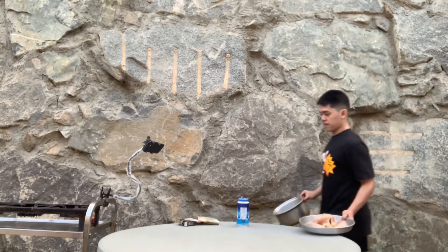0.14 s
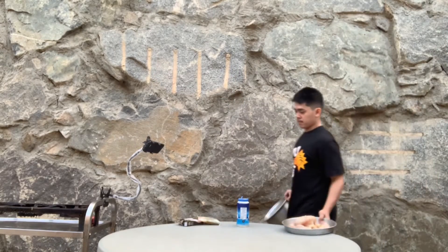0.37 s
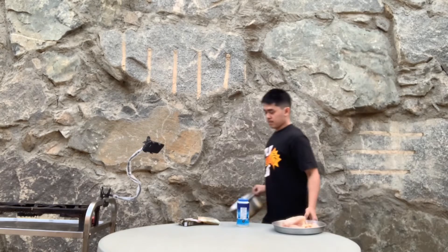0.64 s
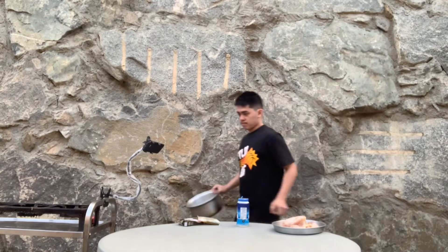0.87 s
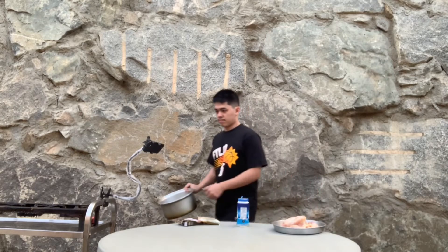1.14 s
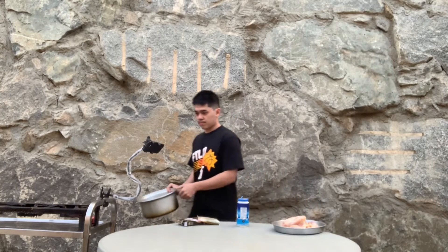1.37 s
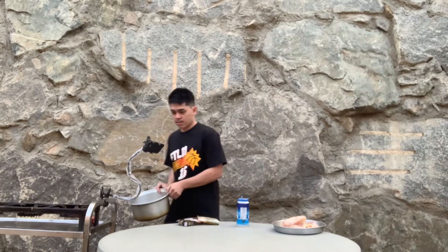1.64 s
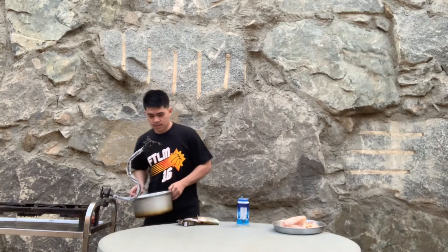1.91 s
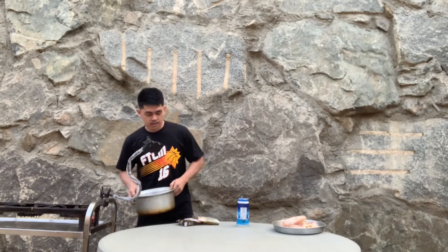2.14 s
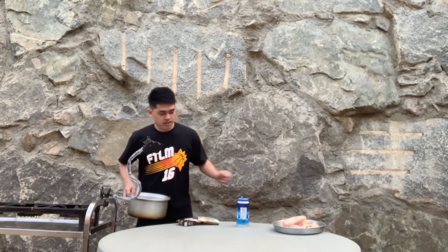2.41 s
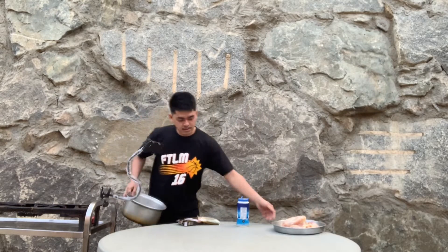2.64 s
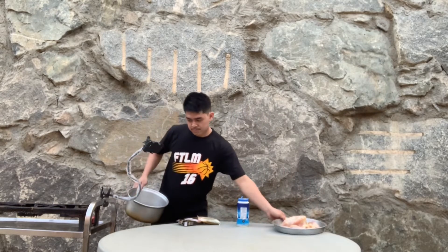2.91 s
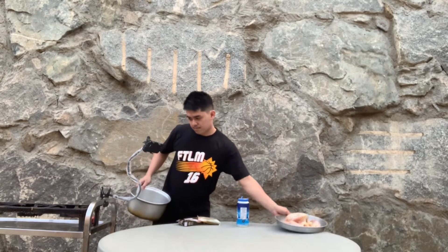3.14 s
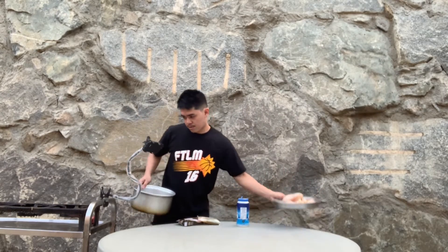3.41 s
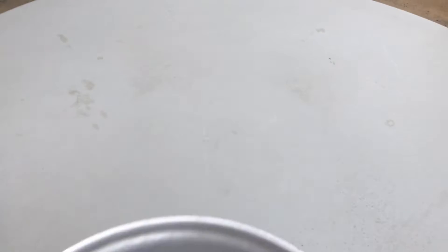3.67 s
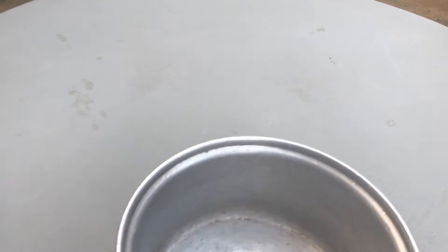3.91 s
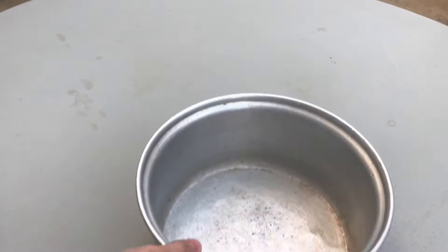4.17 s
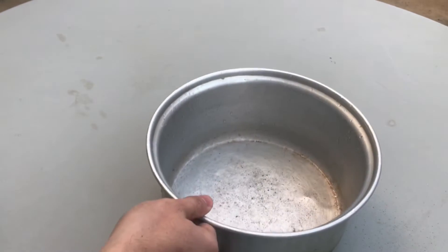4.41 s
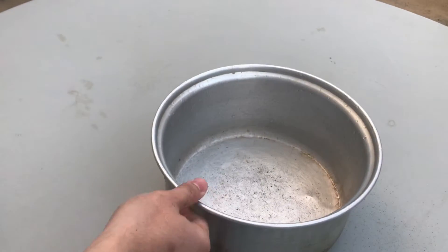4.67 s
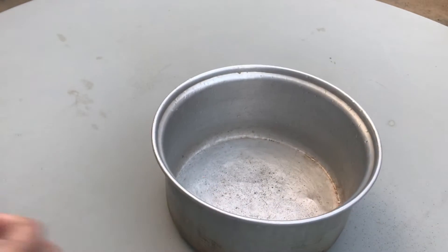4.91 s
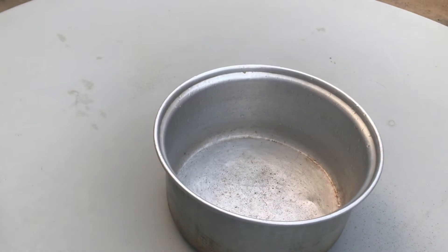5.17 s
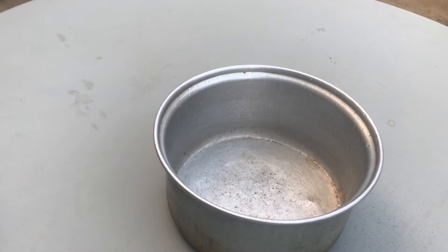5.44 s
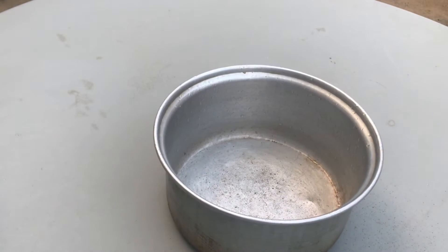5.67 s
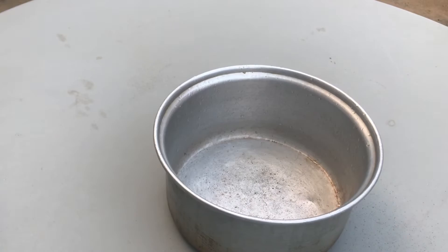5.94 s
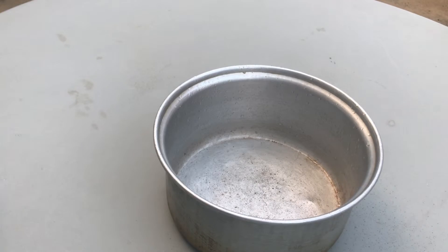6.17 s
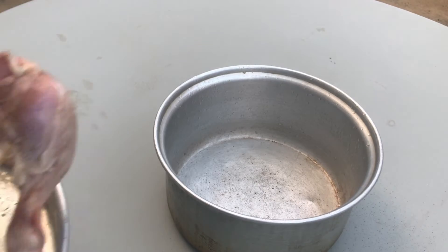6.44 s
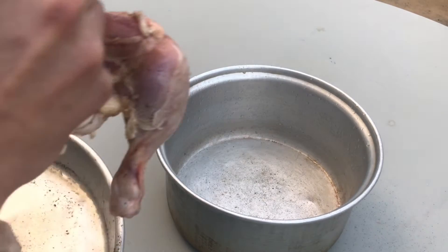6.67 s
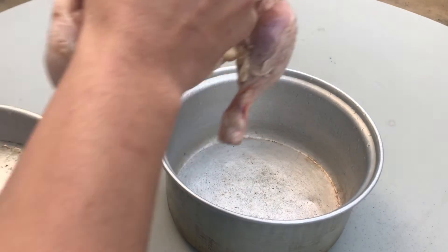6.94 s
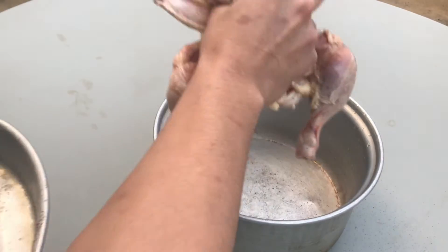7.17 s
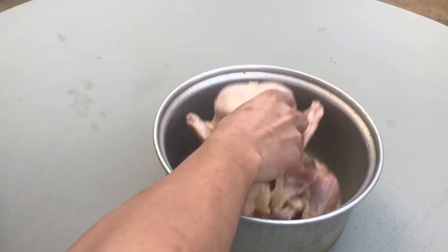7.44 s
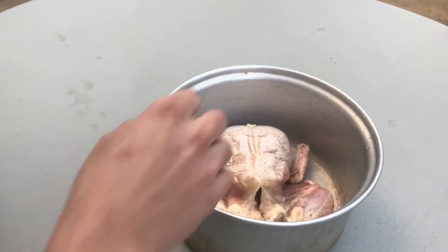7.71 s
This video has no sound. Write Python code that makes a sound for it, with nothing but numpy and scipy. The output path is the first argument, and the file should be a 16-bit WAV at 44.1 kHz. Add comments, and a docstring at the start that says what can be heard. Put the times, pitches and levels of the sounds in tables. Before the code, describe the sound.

Distant tray knocks and shuffling shoes, a tiny gap, then a close aluminium pot clank and scrape, faint ticks, and a wet, ringing thud.

```python
"""Outdoor cooking table before a stone wall, heard wide in stereo, then after a short gap close up in mono.
Wide: a tray is set down (blows ring its modes), shoes scuff on gritty paving (filtered friction noise and snaps).
Close: an aluminium pot lands on the plastic table (struck modes) and is slid along it (modes driven by stick-slip),
fingers and wet skin tick (noise bursts), then a raw chicken slaps into the pot (bursts, squelch and a ringing rim).
Far traffic and air (coloured noise) lie under both, with low throbs (wavering sines)."""
import sys
import numpy as np
from scipy import signal
from scipy.fft import rfft, irfft, next_fast_len
from scipy.io import wavfile
from scipy.ndimage import uniform_filter1d

SR = 44100
rng = np.random.default_rng(int(sys.argv[2]) if len(sys.argv) > 2 else 0)


def how_loud(loudness_db):
    """Turn decibels into a plain amplitude multiplier (0 dB gives 1, 20 dB gives 10)."""
    steps = np.asarray(loudness_db, float) / 20
    return 10 ** steps


def bounce(signal):
    """Save signal as a 16-bit WAV file at the path given by the first command-line argument."""
    frames = np.transpose(np.atleast_2d(signal))
    limited = np.clip(frames, -1, 1)
    pcm = np.round(limited * 32767).astype(np.int16)
    wavfile.write(sys.argv[1], SR, pcm)


N = 344862
T = np.arange(N) / SR  # time axis, s
CUT_S = 3.6365  # the wide view ends


def unit(x):
    """Scale to rms 1."""
    return x / np.sqrt(np.mean(x ** 2))


def colour(x, points):
    """Filter by (Hz, dB) points joined on a log frequency axis."""
    hz, db = np.transpose(points)
    size = next_fast_len(len(x))
    f = np.maximum(np.fft.rfftfreq(size, 1 / SR), 1)
    gain = how_loud(np.interp(np.log(f), np.log(hz), db))
    return irfft(rfft(x, size) * gain, size)[:len(x)]


def grains(spread_db):
    """Dense noise whose samples have long-tailed sizes: grit and stick-slip."""
    sizes = uniform_filter1d(rng.exponential(size=N), size=3)
    return unit(rng.standard_normal(N) * how_loud(spread_db * sizes))


def walk(rate):
    """Random levels held 1 / rate s and slewed twice."""
    k = int(SR / rate)
    steps = np.repeat(rng.standard_normal(N // k + 1), k)
    return uniform_filter1d(uniform_filter1d(steps, k), k)[:N]


def ring(force, modes):
    """A bank of decaying modes driven by a force; neighbours start in opposite directions."""
    out = 0
    for k, (hz, db, t60, *_) in enumerate(modes):
        r = 1000 ** (-1 / (t60 * SR))
        w = 2 * np.pi * hz / SR
        mode = signal.lfilter([0, r * np.sin(w)], [1, -2 * r * np.cos(w), r * r], force + 1e-18)
        out = out + (-1) ** k * how_loud(db) * mode
    return out


def push(blows, order):
    """Half-sine force pulses of equal impulse at equal level (column order); softer contact pushes longer."""
    force = np.zeros(N)
    for blow in blows:
        start = int(blow[0] * SR)
        contact_s = blow[-1] / 1000
        shape = np.sin(np.pi * np.clip(T[:512] / contact_s, 0, 1))
        force[start:start + 512] += how_loud(blow[order]) * shape / shape.sum()
    return force


def bursts(rows, octaves, t60):
    """Noise clicks with a quick rise and a decay, each in a band about its own centre."""
    out, t = np.zeros(N + 4096), T[:4096]
    for s, db, hz in rows:
        noise = rng.standard_normal(4096)
        band = colour(noise, [(hz / 2 ** octaves, -18), (hz, 0), (hz * 2 ** octaves, -18)])
        fade = t60 * min(3000 / hz, 1) ** 0.55  # above 3 kHz, higher clicks die sooner
        envelope = 1000 ** (-t / fade) * np.minimum(t / (0.051 * fade), 1)
        start = int(s * SR)
        out[start:start + 4096] += how_loud(db) / 2 * unit(band) * envelope
    return out[:N]


def stroke(start, length, db, rise_db_s, fall_db_s, tail_db=-99, tail_db_s=0):
    """Gain along time: rise, hold, fall, and a slower faint tail."""
    t = T[::8]
    before = np.maximum(start - t, 0)
    after = np.maximum(t - start - length, 0)
    ending_db = np.maximum(np.maximum(-fall_db_s * after, tail_db - tail_db_s * after), -99)
    return np.repeat(how_loud(db - rise_db_s * before + ending_db), repeats=8)[:N]


# fine treble of friction: f/Hz, level/dB
FRICTION_TREBLE = [(5000, -38.5), (8000, 1), (10500, 2.5), (13000, 2.5), (15000, -5.5), (15600, -33.5)]


def rubbed(noise, rows, rasp, *ending):
    """Friction noise as a rasp and a finer treble, each stroke with its own share of both."""
    gain = np.array([stroke(s, length, 0, rise, *ending) for s, length, *_, rise in rows])
    rasp_db, treble_db = np.transpose(rows)[2:4]
    rasp_part = how_loud(rasp_db) @ gain * unit(colour(noise, rasp))
    return rasp_part + how_loud(treble_db) @ gain * unit(colour(noise, FRICTION_TREBLE))


# spectrum of the air in the wide view: f/Hz, level/dB
WIDE_AIR_COLOUR = [(15, -37), (25, 1), (142, -4), (278, -15.5), (326, -12.5), (354, -16.5), (588, -23),
                   (673, -25), (749, -25), (2180, -35.5), (5140, -57), (12100, -54.5), (15000, -49)]
# spectrum of the air close up: f/Hz, level/dB
CLOSE_AIR_COLOUR = [(15, -62), (25, -6), (59, 4), (114, -4.5), (166, -8), (212, -14), (309, -11.5),
                    (451, -21), (607, -22.5), (734, -21), (1520, -26), (2050, -31.5), (4740, -38),
                    (8500, -40.5), (10500, -45), (13000, -38), (16000, -45)]


def background():
    """Far traffic and air: gently swaying noise, with another colour in each view."""
    wide_gain, close_gain = how_loud(-52.5 + 2.5 * walk(17)), how_loud(-54 + 0.8 * walk(8))
    wide = wide_gain * unit(colour(rng.standard_normal(N), WIDE_AIR_COLOUR))
    close = close_gain * unit(colour(rng.standard_normal(N), CLOSE_AIR_COLOUR))
    return np.where(T < CUT_S, wide, close)


# soles and cloth dragging, the hiss of the tray's hit, and fingers leaving the pot, one row a stroke:
# t/s, length/s, rasp level/dB, treble level/dB, rise/(dB/s)
FRICTION_STROKES = [(0., 0.098, -53.5, -56.5, 900), (0.142, 0.031, -45.5, -74, 9000),
                    (0.195, 0.27, -58.5, -62.5, 499.5), (0.412, 0.1432, -55.5, -56, 3000),
                    (0.588, 0.1484, -54.5, -63.5, 2008), (0.782, 0.077, -68.5, -80.5, 498),
                    (0.878, 0.0256, -61.5, -59, 4995), (1.083, 0.0162, -54.5, -80, 9004),
                    (1.156, 0.0613, -54, -61.5, 399), (1.334, 0.0263, -62.5, -69, 3000),
                    (1.585, 0.1041, -49, -60.5, 9007), (1.851, 0.0873, -51, -61, 508.5),
                    (2.088, 0.0187, -65, -73, 499.5), (2.356, 0.021, -64, -86, 5005.5),
                    (2.389, 0.012, -57, -72.5, 500), (2.773, 0.019, -65.5, -68, 5000),
                    (2.863, 0.0538, -57, -65, 9000), (2.944, 0.096, -65, -71, 500),
                    (3.07, 0.0791, -60, -68, 907), (3.429, 0.025, -62.5, -85.5, 4985),
                    (3.501, 0.0303, -51, -57.5, 408.5), (3.847, 0.1145, -56.5, -68, 900),
                    (3.99, 0.0145, -48.5, -66, 906), (4.63, 0.008, -57, -62, 4998.5),
                    (4.681, 0.0117, -66, -87.5, 900.5)]
# rasp of these strokes: f/Hz, level/dB
FRICTION_RASP = [(250, -11.5), (500, -6.5), (1200, 1), (2300, 1.5), (4000, -3), (7000, -8), (10000, -37.5)]


def scuffs():
    """Soles drag grit: patchy friction; grains snap at random in four bands, low to high."""
    grit = 0
    for lo_hz, hi_hz in [(60, 1800), (1800, 3800), (3800, 7000), (7000, 20000)]:
        snap_now = rng.random(N) < 50 / SR  # 50 snaps a second
        snaps = snap_now * how_loud(3 + 4 * rng.standard_normal(N))
        cracks = signal.lfilter([1], [1, -1000 ** (-1 / (0.02 * SR))], snaps)  # t60 20 ms
        friction = grains(4.8) * how_loud(2.0 * walk(80)) * (1 + cracks)
        band = signal.butter(2, [lo_hz, hi_hz], "band", fs=SR, output="sos")
        grit = grit + signal.sosfilt(band, friction)
    # fall dB/s, then a fainter tail: tail dB, tail fall dB/s
    return rubbed(grit, FRICTION_STROKES, FRICTION_RASP, 449.5, -16, 88.5)


# sharp contacts: t/s, level/dB, centre f/Hz
GRIT_CLICKS = [(0.1516, -25.5, 1556), (0.5954, -33, 1700), (0.8814, -48.5, 4670), (1.0879, -35, 2120),
               (1.5728, -36, 1860), (1.6272, -30, 2480), (1.6394, -32.5, 6450), (1.8565, -32.5, 3000),
               (1.8971, -34, 3750), (1.931, -40, 4700), (2.7771, -48.5, 7000), (2.8719, -46, 2300),
               (3.5394, -41.5, 2620)]


def grit_clicks():
    """Sharp contacts as short bursts of noise."""
    return bursts(GRIT_CLICKS, octaves=1.8, t60=0.064)


# blows of the tray: t/s, table level/dB, tray level/dB, contact/ms
TRAY_HITS = [(.152, -66, -36, 0.262), (.166, -44.5, -27.5, 1.735), (.178, -33, -26.5, 2.28),
             (.214, -35.5, -29, 2.33), (.41, -40, -38.5, 2.72), (.596, -69, -53.5, 0.18),
             (1.088, -52, -49, 0.3), (1.572, -47, -41, 1.21), (2.872, -38.5, -54, 0.534),
             (2.885, -42, -44, 1.07)]
# modes of the tray: f/Hz, level/dB, t60/s
TRAY_MODES = [(294.1, -0.5, 0.247), (439.7, -11, 0.249), (567, 4, 0.065), (650, 12, 0.012),
              (1000, -3.5, 0.134), (1316, -13, 0.37), (1645, 6, 0.039), (2210, -81.5, 0.046),
              (2480, -55, 0.049), (3700, 3.5, 0.061)]
# modes of the plastic table top, also excited by the pot: f/Hz, level/dB, t60/s
TABLE_MODES = [(79.93, -8, 0.39), (98.5, -2, 0.25), (124.58, -6.5, 0.35), (168, -8.5, 0.35),
               (206.6, -4, 0.15), (233.4, -2, 0.041), (308.6, -8.5, 0.15), (386.3, -13.5, .1),
               (53.4, -8.5, 0.27)]


def tray_landing():
    """The tray meets the table: each blow rings both the table top and the tray."""
    return ring(push(TRAY_HITS, order=1), TABLE_MODES) + ring(push(TRAY_HITS, order=2), TRAY_MODES)


# rattle of table and vessel at landings, and brighter tails of finger taps: t/s, level/dB, centre f/Hz
RATTLE_AND_TAP_BURSTS = [(.154, -29, 480), (.175, -46.5, 340), (.205, -39, 290), (.394, -34.5, 610),
                         (1.089, -46.5, 570), (1.573, -36.5, 468), (2.873, -40, 388), (4.035, -14.5, 500),
                         (4.795, -41, 4600), (4.877, -50, 3000), (4.981, -43.5, 6950), (7.524, -15, 616.5),
                         (7.54, -56, 220)]


def rattles_and_tap_tails():
    """Rattle of table and vessel at landings, and brighter tails of finger taps, as wide-band noise bursts."""
    return bursts(RATTLE_AND_TAP_BURSTS, octaves=1.6, t60=0.093)


# low throbs, the one at 3.593 s a thump as the scene changes: t/s, length/s, level/dB, f/Hz
THROB_STROKES = [(0.198, 0.129, -56, 80.16), (0.535, 0.175, -53.5, 79), (2.759, 0.01, -39.5, 66),
                 (2.938, 0.0136, -41.5, 66), (3.03, 0.0233, -47, 58), (3.134, 0.0304, -38, 58),
                 (3.272, 0.032, -45, 61.8), (3.381, 0.0091, -44.5, 73.8), (3.44, 0.085, -39, 60),
                 (3.593, 0.027, -44.5, 61.8), (5.809, 0.29, -52, 101.5)]


def throbs():
    """Low throbs, as of wind on the microphone or a far engine: sines of wavering pitch and uneven level. The
    one at 3.59 s is a low thump just as the scene changes."""
    waver, uneven = 2 ** (0.35 * walk(45)), how_loud(3 * walk(40))
    out = 0
    for s, length, db, hz in THROB_STROKES:
        tone = unit(np.sin(2 * np.pi * np.cumsum(hz * waver) / SR))
        out = out + stroke(s, length, db, rise_db_s=363.5, fall_db_s=321.5) * tone
    return uneven * out


# hollow pops and clinks: t/s, level/dB, f/Hz, t60/s
POP_HITS = [(.602, -25, 1900, 0.174), (0.639, -44.5, 1000, 0.175), (.697, -33.5, 1035, 0.04),
            (1.211, -34.5, 1100, 0.036), (3.977, -44, 1056, 0.43), (4.002, -30.5, 1066, 0.0304),
            (5.591, -44, 650, 0.086), (5.661, -49, 714, 0.065), (5.681, -50.5, 742, 0.0502),
            (7.469, -23.5, 507, 0.0353), (7.526, -18, 931, 0.0764)]


def pops():
    """Small pops and clinks: one mode each, set off by a 0.7 ms push."""
    return sum(ring(push([(s, db, 0.7)], order=1), [(hz, 0, t60)]) for s, db, hz, t60 in POP_HITS)


# clear ticks, the first the pot's landing contact: t/s, level/dB, centre f/Hz
CLEAR_TICKS = [(4.033, -6.5, 2850), (4.0658, -17.5, 3400), (4.0803, -14.5, 3410), (4.6302, -53.5, 3460),
               (4.795, -37, 2990), (4.9623, -39.5, 3420), (4.9801, -39, 8500), (5.0774, -48, 3420),
               (5.1178, -44.5, 3240), (5.503, -47.5, 10820), (5.6281, -47.5, 6550), (5.683, -47, 3420),
               (5.7148, -40.5, 12400), (5.7339, -44, 3860), (5.9576, -38, 10300), (6.0207, -44.5, 8580),
               (6.071, -44.5, 11000), (6.3083, -44, 7200), (7.226, -52.5, 3430), (7.1545, -41.5, 4200)]
# spells of busy hands with fainter ticks: from t/s, to t/s, rate/(1/s)
FAINT_TICK_SPELLS = [(5., 6.3, 14), (7.2, 7.47, 18)]


def ticks():
    """Fingers, nails and wet skin: clear ticks, and fainter ones at random while hands are busy. The first
    clear tick, at 4.033 s, is the sharp contact of the pot landing."""
    faint = []
    for start, end, rate in FAINT_TICK_SPELLS:
        for when, size, pitch in rng.random((int(rate * (end - start)), 3)):
            faint.append((start + (end - start) * when, -51 - 10 * size, 3200 * 4.2 ** pitch))
    return bursts(CLEAR_TICKS + faint, octaves=1.0, t60=0.018)


# blows on the pot: t/s, table level/dB, pot level/dB, contact/ms
POT_HITS = [(4.0332, -23, -30, 0.063), (4.035, -17.5, -19, 0.05), (4.041, -23.5, -42, 0.23),
            (4.051, -21, -47, 0.35), (4.065, -45.5, -31, 0.163), (4.081, -42, -52, .15),
            (4.629, -50.5, -48.5, 0.6), (4.796, -49.5, -47, .15), (4.963, -76, -46, 0.364),
            (7.156, -69.5, -46.5, 0.546), (7.223, -72, -62.5, 0.19), (7.487, -35.5, -41.5, 0.63),
            (7.498, -35.5, -24, 0.05), (7.523, -30.5, -32.5, 0.19), (7.532, -30.5, -50.5, 0.43),
            (7.543, -13.5, -41.5, 11.83), (7.567, -30, -42, 0.29), (7.6, -26.5, -29.5, 5.63),
            (7.638, -31, -51.5, 4.96), (7.709, -34.5, -61, 5.17)]
# modes of the pot in the hand: f/Hz, struck level/dB, t60/s, rubbed level/dB
POT_MODES = [(525, -6, 0.096, -7.5), (621.4, -12, 0.14, -3), (711, -12.5, 0.045, -7.5),
             (1000, -12, 0.18, 1), (1100, 0, 0.017, 0.5), (1561, -5.5, 0.065, 0.5),
             (1689, -4, 0.038, -16.5), (2007, -7.5, 0.11, -20.5), (2098, -1.5, 0.02, -12.5),
             (2480, -1, 0.039, -4.5), (2938, -3, 0.0695, -9.5), (3477, -13, 0.03, -10),
             (4462, -7.5, 0.065, -12.5), (4390, -16.5, 0.021, -8), (6380, -18.5, 0.048, -16.5),
             (7820, -26, 0.042, -20.5)]


def pot_landing():
    """The pot meets the table, and is hit again later: each blow rings both table top and pot."""
    return ring(push(POT_HITS, order=1), TABLE_MODES) + ring(push(POT_HITS, order=2), POT_MODES)


# pot sliding on the table: t/s, level/dB, hiss of the contact over it/dB
SLIDE_LEVELS = [(4.041, -60, -10.5), (4.052, -33.5, -17), (4.09, -32.5, -3), (4.19, -29.5, -0.5),
                (4.26, -32.5, -2.5), (4.375, -33, -2), (4.398, -36.5, -9), (4.43, -40, -3.5),
                (4.46, -36, -2), (4.522, -43.5, 1.5), (4.545, -57, 3.5), (4.62, -67.5, -1.5),
                (4.66, -98, 0)]
# hiss of the sliding contact: f/Hz, level/dB
SLIDE_HISS_COLOUR = [(200, -62), (450, 5), (1000, 3), (2500, 4), (4500, -1.5), (7000, -0.5), (10500, -7),
                     (13000, -2.5), (16000, -17)]


def slide():
    """Stick-slip under the pot drives the modes of pot and table and hisses directly."""
    slip = grains(3) * how_loud(2.5 * walk(60))
    s, level_db, hiss_db = np.transpose(SLIDE_LEVELS)
    level = how_loud(np.interp(T, s, level_db, left=-200, right=-200))
    hiss = how_loud(np.interp(T, s, hiss_db)) * unit(colour(slip, SLIDE_HISS_COLOUR))
    body = 0
    for hz, _, t60, rubbed_db in POT_MODES:
        # the contact patch wanders over the base, so each mode is driven by turns
        force = level * slip * how_loud(3.5 * walk(30))
        # steady friction builds a mode up as the root of its decay time
        build_up = np.sqrt(t60 * SR / (4 * np.log(1000)))
        body = body + ring(force, [(hz, rubbed_db, t60)]) / build_up
    body = np.interp(T + 0.0008 * walk(18), T, body)  # the load bends the pitch a little
    table = unit(ring(slip, TABLE_MODES))
    return how_loud(-10) * body + level * (how_loud(-9) * table + hiss)


# wet flesh squelching, at the drop and as it settles: t/s, length/s, rasp level/dB, treble level/dB, rise/(dB/s)
SQUELCH_STROKES = [(7.485, 0.0055, -39.5, -44.5, 2496), (7.5, 0.02, -32, -78.5, 909.5),
                   (7.568, .09, -56, -63, 899.5)]
# rasp of the squelch: f/Hz, level/dB
SQUELCH_RASP = [(400, 1.5), (900, 1.5), (3300, -10.5), (6000, -10), (9000, -42)]
# wet slaps: t/s, level/dB, centre f/Hz
WET_SLAPS = [(7.499, -6.5, 3020), (7.502, -8, 1350), (7.5215, -7, 6860), (7.528, -8.5, 5000),
             (7.532, -5.5, 7000), (7.551, -38.5, 1200), (7.569, -26.5, 6000), (7.575, -22.5, 2460),
             (7.599, -27.5, 9000), (7.61, -35, 9000), (7.637, -33, 3400)]
# blow on the rim: t/s, level/dB, contact/ms
RIM_HIT = [(7.5, -45, 0.094)]
# rim of the pot, ringing on once the hand is off: f/Hz, level/dB, t60/s
RIM_MODES = [(1324, -20.5, 4.1), (1900, -13, 2.75), (3300, -8.5, 0.33)]


def chicken():
    """Wet slaps and a crackly squelch; the free rim rings on."""
    # fall dB/s, tail dB, tail fall dB/s
    squelch = rubbed(grains(4), SQUELCH_STROKES, SQUELCH_RASP, 500, -24.5, 64)
    slaps = bursts(WET_SLAPS, octaves=4.7, t60=0.01962)
    return squelch + slaps + ring(push(RIM_HIT, order=1), RIM_MODES)


# width of the scattered sound: f/Hz, side over mid level/dB
SIDE_WIDTH = [(60, -1.5), (110, -40), (200, -1.5), (380, -2.5), (700, 6), (1290, -1), (2380, -3),
              (4400, -0.5), (8120, 2), (15000, -8.5)]
# bass leaning to the left port: f/Hz, level/dB
LEFT_LEAN = [(60, -14), (300, -11), (1000, -68)]


def wide_view(diffuse, direct):
    """The stone wall and ground scatter sound to the two ports unequally: a diffuse side signal."""
    scatter = rng.standard_normal(4096) * 1000 ** (-T[:4096] / 0.0457)
    scatter = scatter / np.sqrt(np.sum(scatter ** 2))
    # table knocks arrive more from the front
    spread = signal.fftconvolve(diffuse + how_loud(-12.5) * direct, scatter)[:N]
    # wind and rumble differ at the two ports
    lagged = colour(np.roll(diffuse, 1500), [(30, -6), (120, -7), (250, -40)])
    mid = diffuse + direct
    side = colour(spread, SIDE_WIDTH) + colour(mid, LEFT_LEAN) + lagged
    top = signal.ellip(8, 0.2, 60, 14600, fs=SR, output="sos")  # less top than close up
    return signal.sosfilt(top, [mid + side, mid - side])


def scene():
    """Wide stereo view, a short gap, then the mono close view fading in."""
    diffuse = background() + scuffs() + grit_clicks() + throbs()
    direct = tray_landing() + rattles_and_tap_tails() + pops() + ticks() + pot_landing() + slide() + chicken()
    fade_in = np.clip((T - 3.657) / 0.008, 0, 1)  # from 3.657 s, over 8 ms
    return np.where(T < CUT_S, wide_view(diffuse, direct), (diffuse + direct) * fade_in)


def roll_off(x):
    """The treble ends steeply here."""
    return signal.sosfilt(signal.butter(12, 16620, fs=SR, output="sos"), x)


# treble dips of the microphone: f/Hz, level/dB
MICROPHONE_DIPS = [(4000, -1), (5000, -2.5), (6200, -1), (7600, -2.5), (9000, 0), (10500, -1), (12500, 0)]


def record(dry):
    """The microphone drops the lowest bass and has a few shallow dips in the treble."""
    heard = np.array([colour(channel, MICROPHONE_DIPS) for channel in dry])
    bass_cut = signal.butter(2, 36, "high", fs=SR, output="sos")
    mix = signal.sosfilt(bass_cut, heard)
    return roll_off(mix)


dry = scene()
out = record(dry)
bounce(out)
```